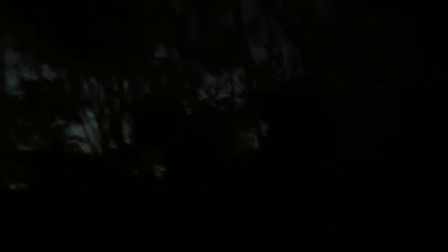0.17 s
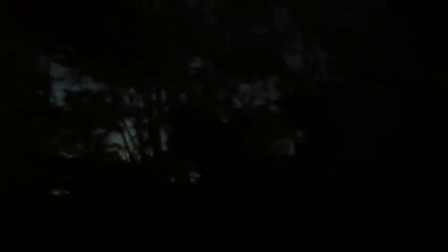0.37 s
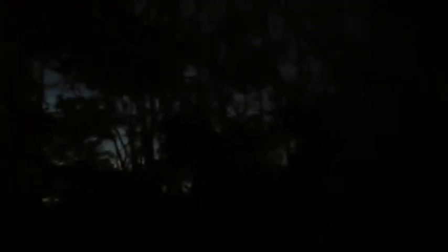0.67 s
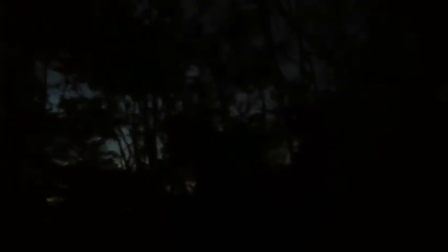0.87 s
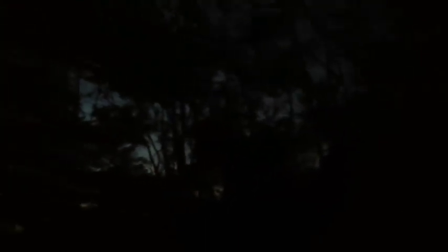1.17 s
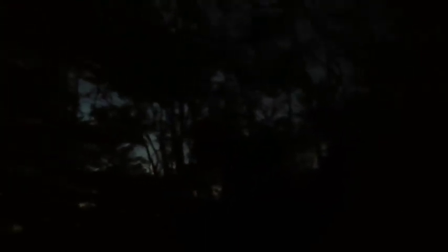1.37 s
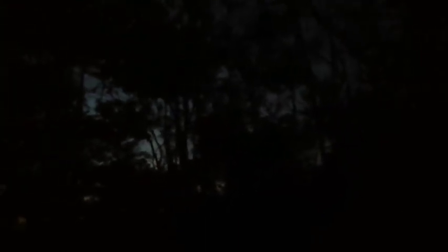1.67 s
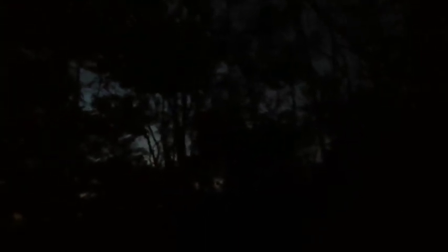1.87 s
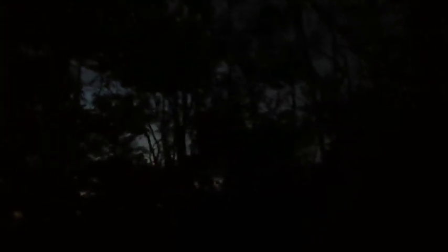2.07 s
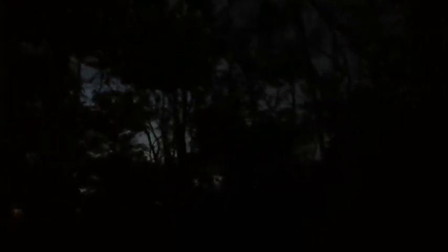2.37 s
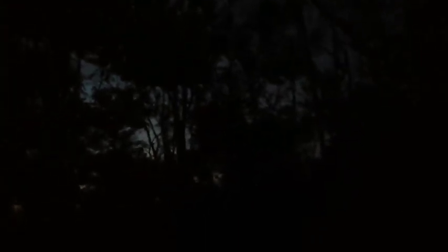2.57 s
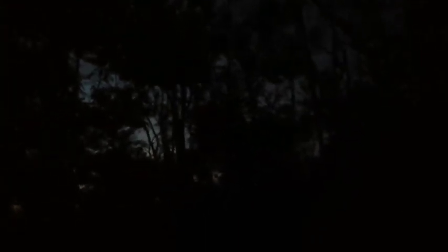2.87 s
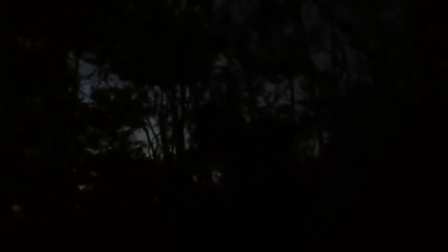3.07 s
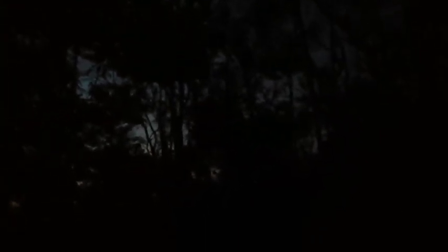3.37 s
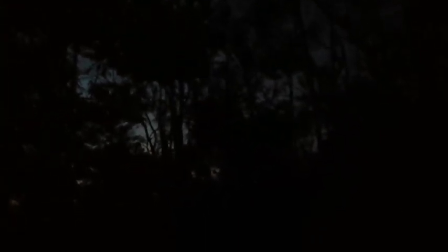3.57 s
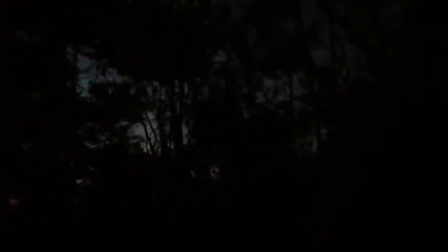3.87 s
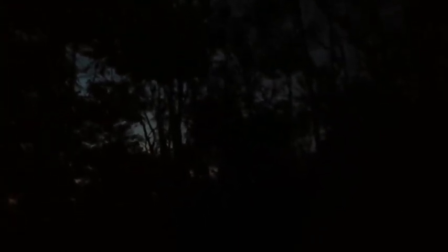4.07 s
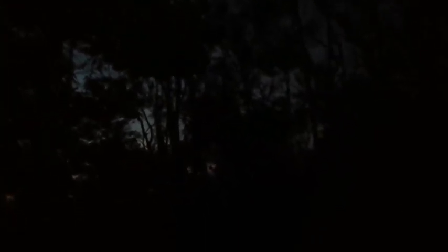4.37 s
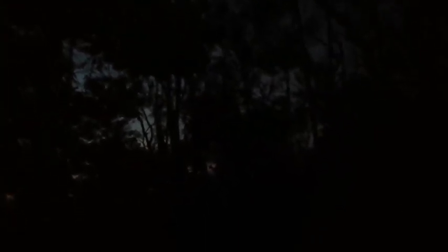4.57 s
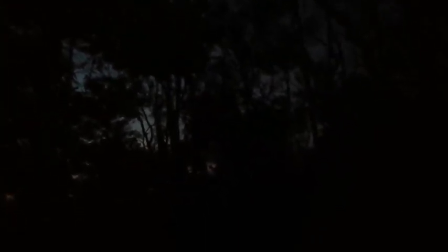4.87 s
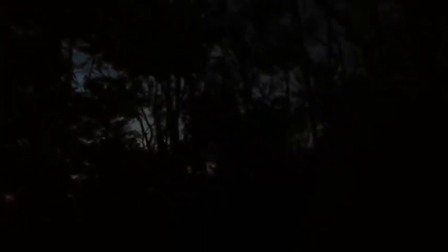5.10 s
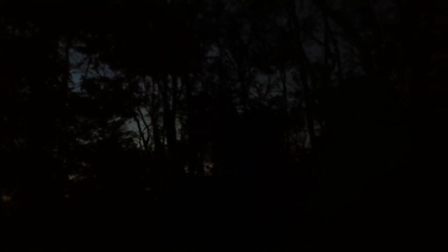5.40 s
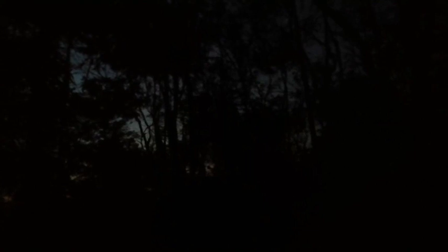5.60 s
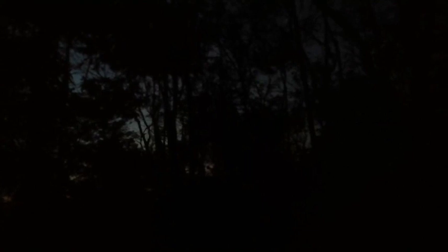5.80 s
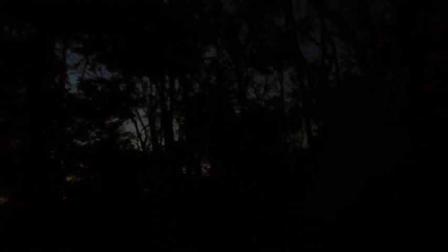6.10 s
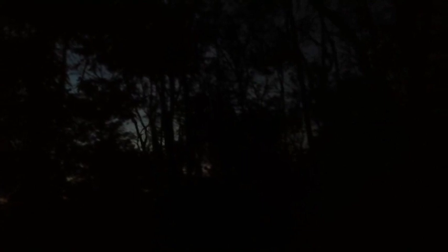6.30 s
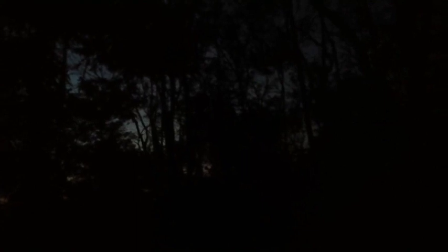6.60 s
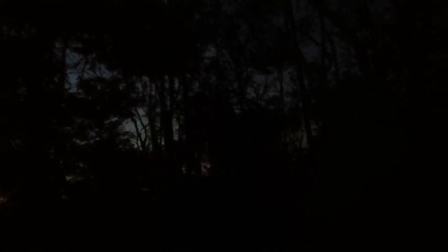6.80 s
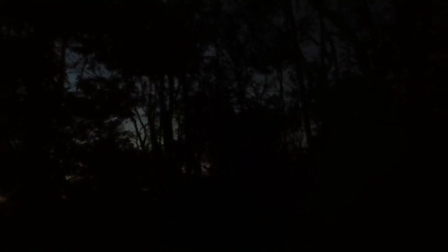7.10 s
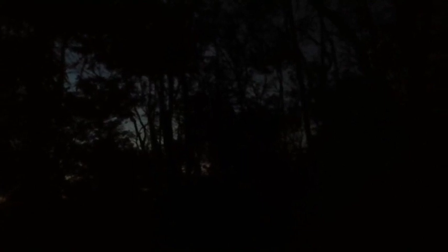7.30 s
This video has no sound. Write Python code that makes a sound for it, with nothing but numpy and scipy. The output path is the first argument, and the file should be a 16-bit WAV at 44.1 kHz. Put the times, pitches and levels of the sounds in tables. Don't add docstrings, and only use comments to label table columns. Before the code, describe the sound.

Steady shrill insect trilling in nighttime woods, five quick katydid chirps at first, then dull handling bumps and a few dry twig ticks.

```python
import sys
import numpy as np
from scipy import signal
from scipy.fft import rfft, irfft
from scipy.io import wavfile
from scipy.ndimage import uniform_filter1d

SR = 44100
rng = np.random.default_rng(int(sys.argv[2]) if len(sys.argv) > 2 else 0)


def makeup_ratio(level_db):
    decades = np.asarray(level_db, float) / 20
    return 10 ** decades


def wrap_up_sound(samples):
    columns = np.atleast_2d(samples).T
    tamed = np.clip(columns, -1, 1)
    steps = np.round(tamed * 32767).astype(np.int16)
    wavfile.write(sys.argv[1], SR, steps)


N = 328545


def evened(x):
    return x / np.sqrt(np.mean(x ** 2) + 1e-20)


def curve(rows, column, at):
    rows = np.array(rows, float)
    return np.interp(at, rows[:, 0], rows[:, column])


def read(points, hz):
    f, value = np.transpose(points)
    return np.interp(np.log(hz + 1), np.log(f + 1), value, -90, -90)


def add(mix, s, sound):
    start = round(s * SR)
    part = mix[:, max(start, 0):][:, :sound.shape[1] + min(start, 0)]
    part += sound[:, max(-start, 0):][:, :part.shape[1]]


def layer(rows, source):
    out = np.zeros((2, N))
    for s, *settings in rows:
        add(out, s, source(*settings))
    return out


def drift(hz):
    t = np.arange(0, N + 256, 256) / SR
    f = np.geomspace(hz / 20, hz, num=16)[:, None]
    waves = np.sin(2 * np.pi * (f * t + rng.random((16, 1)))) / np.sqrt(f)
    return np.interp(np.arange(N) / SR, t, evened(waves.sum(0)))


def loop(cycle, turns):
    place = turns % 1 * len(cycle)
    at = place.astype(int)
    return cycle[at] + np.diff(cycle, append=cycle[0])[at] * (place - at)


def band(x, lo_hz, hi_hz):
    return signal.sosfilt(signal.butter(2, [lo_hz, hi_hz], "band", fs=SR, output="sos"), x)


def swells(rows):
    t = np.arange(N) / SR
    return sum(makeup_ratio(db) * np.exp(np.minimum((t - s) / rise, (s - t) / fade)) for s, db, rise, fade in rows)


def pan(pan_db):
    return np.array([[pan_db / 2], [-pan_db / 2]])


def soft_tone(db, length_s, hz, pan_db):
    t = np.arange(round(length_s * SR)) / SR
    waver = 0.0097 * evened(uniform_filter1d(rng.standard_normal(len(t)), 300))
    turns = np.cumsum(hz * (1 + waver)) / SR
    return makeup_ratio(db + 6 + pan(pan_db)) * np.sin(2 * np.pi * turns) * np.hanning(len(t))


def singer(song, tones, effort_db):
    leaves, wobble, scatter, fuzz = .35, .001, .08, 0.39
    t = np.arange(N) / SR
    turns = np.cumsum(curve(song, 1, t)) / SR + wobble * drift(9)
    effort_t = np.linspace(song[0][0], song[-1][0], num=5)
    level = uniform_filter1d(makeup_ratio(np.interp(t, effort_t, effort_db, -60, -60)), 6000)
    multiple, *sides = np.transpose(tones)
    sweep = multiple ** 2 / 70 + rng.random() * multiple
    out = np.zeros((2, N))
    for side, side_db in enumerate(sides):
        detour = .6 * (rng.random() - .5) + .03 * rng.standard_normal() * (multiple - 95)
        path = side * detour
        uneven = fuzz * evened(uniform_filter1d(rng.standard_normal(N), 500))
        shapes = ((1, scatter), (leaves * drift(2.48), 1), (uneven, 3 * scatter))
        for weight, spread in shapes:
            lines = np.zeros(4097, complex)
            phase = sweep + path + spread * rng.standard_normal(len(multiple))
            lines[multiple.astype(int)] = makeup_ratio(side_db) * np.exp(-2j * np.pi * phase)
            out[side] += weight * loop(irfft(lines) * 4096 * np.sqrt(2), turns)
    return out * level


def near_singers():
    # t/s, cycle rate/Hz
    steady = [(0, 58.7), (1.57, 58.71), (4.71, 58.77), (7.45, 58.72)]
    rising = [(0, 60.05), (3.14, 60.14), (3.6, 60.26), (4.71, 60.27), (7.45, 60.49)]
    gliding = [(2.9, 57.26), (4.14, 54.67), (4.6, 54.23), (5.4, 54.04), (6, 54.04), (7.45, 54.2)]
    sinking = [(3.5, 58.05), (4.29, 57.85), (4.69, 57.52), (5.87, 57.2), (6.66, 57.26), (7.45, 57.21)]
    brief = [(1.8, 57.88), (3.2, 57.87)]
    wavering = [(.3, 57.03), (1.13, 57.02), (1.55, 57.23), (1.97, 57.27), (2.7, 56.97), (4.05, 56.92),
                (5.3, 56.94)]
    late = [(5, 56.52), (5.82, 56.48), (6.63, 56.56), (7.45, 56.53)]
    # multiple of the cycle rate, left level/dB, right level/dB
    steady_tones = [(78, -57, -55), (79, -52, -54), (85, -51, -49), (90, -52, -50), (91, -46, -44),
                    (92, -39, -46), (93, -45, -46), (94, -51, -51), (104, -50, -59), (116, -55, -57),
                    (117, -54, -54), (118, -53, -57), (127, -47, -64), (128, -55, -62), (129, -48, -57),
                    (130, -49, -61), (131, -47, -64), (137, -46, -72), (139, -47, -62), (145, -50, -73),
                    (150, -48, -68)]
    rising_tones = [(83, -47, -48), (84, -49, -53), (85, -57, -58), (86, -57, -60), (91, -60, -50),
                    (92, -62, -56), (93, -54, -54), (94, -42, -47), (95, -43, -44), (96, -45, -47),
                    (97, -51, -60), (104, -63, -58), (106, -53, -57), (107, -59, -56), (108, -59, -56),
                    (120, -54, -65), (124, -53, -70), (126, -52, -62), (128, -59, -68), (129, -52, -69),
                    (146, -57, -68), (147, -57, -65), (153, -53, -65)]
    gliding_tones = [(95, -49, -53), (96, -43, -50), (97, -49, -53), (100, -46, -54), (105, -45, -49),
                     (106, -48, -54), (107, -54, -51), (108, -43, -46), (109, -43, -44), (110, -50, -52),
                     (114, -53, -52), (119, -55, -58), (120, -51, -56), (126, -50, -59), (132, -48, -64),
                     (138, -43, -59), (149, -41, -58), (150, -42, -56), (151, -46, -66), (160, -46, -62),
                     (161, -49, -65), (163, -46, -64)]
    sinking_tones = [(99, -45, -48), (100, -51, -51), (102, -47, -47), (103, -44, -50), (120, -52, -59),
                     (125, -49, -70), (130, -38, -57), (131, -38, -54), (133, -48, -65), (135, -48, -63),
                     (141, -48, -51), (142, -49, -68), (144, -46, -61), (145, -38, -62), (146, -49, -63),
                     (150, -48, -60), (151, -49, -62), (152, -47, -63), (154, -47, -63), (155, -49, -59)]
    brief_tones = [(100, -58, -52), (119, -57, -61), (120, -65, -56), (121, -49, -62), (123, -54, -59),
                   (130, -45, -59), (131, -44, -59), (132, -51, -64), (133, -50, -65), (134, -55, -62),
                   (138, -49, -64), (139, -56, -64), (140, -46, -60), (141, -41, -55), (143, -50, -62),
                   (149, -49, -70), (152, -56, -63), (154, -53, -67), (156, -53, -66), (162, -52, -68)]
    wavering_tones = [(80, -58, -58), (89, -50, -61), (91, -50, -56), (95, -45, -58), (96, -47, -48),
                      (97, -49, -51), (98, -52, -55), (99, -46, -54), (102, -58, -53), (103, -53, -51),
                      (104, -52, -57), (105, -51, -63), (114, -53, -61), (125, -56, -56), (126, -53, -62),
                      (127, -48, -54), (133, -50, -66), (134, -54, -70), (138, -49, -62), (139, -49, -62),
                      (140, -49, -65)]
    late_tones = [(77, -64, -58), (79, -52, -56), (81, -66, -55), (109, -58, -56), (126, -62, -57),
                  (127, -48, -60), (128, -47, -52), (132, -43, -61), (134, -52, -61), (135, -50, -61),
                  (138, -50, -72), (150, -52, -70), (152, -42, -57), (153, -43, -61), (154, -47, -60),
                  (155, -58, -65), (156, -42, -62), (157, -46, -57), (158, -53, -60), (159, -54, -55)]
    efforts = [
        (-2, 0, 0.5, -4, 1),
        (5, 2.5, 2.5, 3.5, 0.5),
        (-4, -1, 2.5, 4, -1),
        (-14, -19, -23, -17, -21),
        (-8, 1, 3, 3, 3),
        (2, 0, -5, 0.5, 3),
        (-15, -6, -1, -1, -13),
    ]
    songs = (steady, rising, gliding, sinking, brief, wavering, late)
    combs = (steady_tones, rising_tones, gliding_tones, sinking_tones, brief_tones, wavering_tones, late_tones)
    return sum(singer(song, comb, effort_db) for song, comb, effort_db in zip(songs, combs, efforts))


def rasp(db, length_s):
    # f/Hz, width/Hz, level/dB
    wing = [
        (14650, 460, 0),
        (13950, 600, -6),
        (15000, 400, -8),
        (13200, 1100, -11),
    ]
    scrape_db, scrape_s = -11, 0.015
    t = np.arange(round(length_s * SR)) / SR
    strikes = rng.random(len(t)) < 900 / SR
    teeth = rng.standard_normal((2, len(t))) * (1 + strikes * 3)
    rung = 0
    for wing_hz, width_hz, wing_db in wing:
        hz = wing_hz * rng.uniform(1.0, 1.012) - 900 * np.exp(-t / 0.0082) - 3000 * t
        turn = np.exp(2j * np.pi * np.cumsum(hz) / SR)
        r = np.exp(-np.pi * width_hz / SR)
        mode = (turn * signal.lfilter([1], [1, -2 * r, r * r], teeth / turn)).real
        rung = rung + makeup_ratio(wing_db + rng.uniform(-2.7, 2.5)) * evened(mode)
    drag = np.exp(2j * np.pi * np.cumsum(11100 + 40000 * t) / SR)
    scrape = evened((drag * signal.lfilter([1], [1, -1.8, .81], teeth / drag)).real)
    scrape = scrape * t / scrape_s * np.exp(1 - t / scrape_s)
    u = t / length_s / 0.18
    stroke = 1.4 * (u * np.exp(1 - u)) ** 1.9
    stutter = makeup_ratio(2.2 * evened(uniform_filter1d(rng.standard_normal(len(t)), 130)))
    return makeup_ratio([[db], [db - 17]]) * stutter * (evened(rung) * stroke + makeup_ratio(scrape_db) * scrape)


def chirp(db):
    full, weak = rasp(db, 0.14), rasp(db - 3.5, 0.067)
    out = np.pad(full, ((0, 0), (round(0.034 * SR), 0)))
    add(out, 0, weak)
    return out


def katydid():
    # t/s, level/dB
    strokes = [
        (-.03, -27),
        (0.202, -27.5),
        (.408, -23.5),
        (.638, -26.5),
        (.862, -26.5),
    ]
    return layer([(s - 0.034, db) for s, db in strokes], chirp)


def bump(db, swing_s, fade_s, sign):
    slowing = 1.95
    t = np.arange(6000) / SR
    swings = np.log(1 + t / swing_s * (slowing - 1)) / np.log(slowing)
    flex = sign * np.sin(np.pi * swings) * np.exp(-t / fade_s) * (1 - np.exp(-3 * t / swing_s))
    muffle = signal.butter(6, 1900, fs=SR, output="sos")
    return makeup_ratio([[db - 40], [db]]) * signal.sosfilt(muffle, band(flex, 10, 3500))


def hand_bumps():
    # t/s, level/dB, first swing/s, fade/s, sign and strength
    knocks = [(.471, -24, .008, 0.016, 1), (.5018, -11.5, .003, 0.0043, 1),
              (.5045, -14, 0.005, 0.004, -0.91), (.556, -20, .012, 0.025, -0.44),
              (1.018, -19, 0.0083, .01, -1), (1.0301, -2, 0.00054, 0.001, -1.74),
              (1.0304, 2.5, 0.001, 0.0027, -0.88), (1.034, -4.5, .0055, 0.0035, -0.94),
              (1.0154, -14, .0006, .001, -1), (1.053, -25, 0.011, .03, -0.89), (1.079, -24, 0.012, .03, -1),
              (1.1355, -15, 0.0028, .003, 0.94), (1.1412, -22, 0.0018, .003, -0.84),
              (1.1575, -23, 0.0023, .003, -1), (1.1615, -24, 0.0013, 0.0024, -0.85),
              (1.1685, -18, 0.0018, 0.0023, 1), (1.177, -21, 0.0023, .004, -0.71),
              (1.183, -19, 0.0023, 0.0065, -0.69), (1.193, -24, 0.0063, .01, -0.69),
              (1.207, -21, 0.0052, .008, -0.91), (1.1343, -13, 0.00095, 0.0066, -0.64),
              (1.1535, -10.5, .0038, .006, 1), (1.1664, -10.5, 0.0022, 0.0042, -1)]
    return layer(knocks, bump)


def hand_rumble():
    # t/s, level/dB, rise/s, fade/s
    shifts = [
        (0.52, -48, 0.069, 0.14),
        (0.745, -49, .04, 0.18),
        (1.4, -51, 0.018, 0.031),
        (1.06, -40, 0.022, 0.031),
        (0.072, -52.5, .1, 0.28),
    ]
    rumble = makeup_ratio(7.5) * swells(shifts) * evened(band(rng.standard_normal(N), 15, 137))
    return np.array([np.zeros(N), rumble])


def strap():
    # t/s, level/dB, rise/s, fade/s
    groans = [
        (.35, -52, 0.41, 0.2),
        (.75, -45.5, 0.1, 0.14),
    ]
    # t/s, level/dB, f/Hz, left minus right/dB
    slips = [
        (.39, -53, 406, -1),
        (.43, -45, 326, 1),
        (.775, -48, 378, -2),
        (.81, -51, 324, -4),
        (.88, -52, 340, -6),
        (.92, -51, 300, 4),
    ]
    rub = swells(groans) * evened(band(rng.standard_normal((2, N)), 270, 380))
    return rub + layer(slips, lambda db, hz, pan_db: soft_tone(db, 0.042, hz, pan_db))


def twig_tick(db, hz, pan_db):
    t60_s = 0.012
    t = np.arange(2000) / SR
    modes = np.sin(2 * np.pi * hz * t) + 0.23 * np.sin(2 * np.pi * 1.22 * hz * t)
    tone = modes * (1 - np.exp(-t / 0.0007))
    return makeup_ratio(db + 8.5 - 60 * t / t60_s + pan(pan_db)) * tone


def twigs():
    # t/s, level/dB, f/Hz, left minus right/dB
    ticks = [
        (1.0138, -44, 740, -38),
        (1.8687, -36, 1590, -18),
        (2.1665, -33, 1400, -9),
        (2.5506, -40, 990, -2.0),
    ]
    return layer(ticks, twig_tick)


def frog():
    # t/s, level/dB
    pips = [(0, -54), (.045, -59), (1.43, -58), (1.47, -62), (1.54, -62), (1.69, -64), (2.925, -61),
            (2.972, -59), (3, -60), (3.017, -57), (4.495, -65), (4.54, -69), (4.57, -57), (6.048, -61),
            (6.118, -54), (6.15, -66)]
    return layer(pips, lambda db: soft_tone(db, 0.071, 1572, 5))


def drips():
    # t/s, level/dB, f/Hz, left minus right/dB
    drops = [(.26, -59, 1460, 10), (.315, -55, 1380, 8), (.5, -65, 1290, 6), (.54, -58, 1113, 6),
             (1.875, -56, 1410, -6), (6.0, -57, 786, 0), (6.1, -57, 780, 0), (6.485, -54, 920, -1),
             (6.502, -55, 1050, 3), (6.52, -54, 943, 0), (6.537, -53.5, 1210, 0), (6.55, -56, 764, 0),
             (6.55, -59, 1800, 0), (6.568, -56, 1285, 0), (6.59, -57, 790, 1), (6.675, -53, 930, 1)]
    return layer(drops, lambda db, hz, pan_db: soft_tone(db, 0.039, hz, pan_db))


def leaves_brushed():
    # t/s, level/dB, rise/s, fade/s
    brushes = [
        (.33, -58.5, 0.98, 0.67),
        (1.85, -58, 0.16, 0.13),
        (6.56, -55.5, 0.086, 0.083),
    ]
    return makeup_ratio(9.5) * swells(brushes) * evened(band(rng.standard_normal((2, N)), 435, 1370))


def crowd():
    # t/s, level/dB
    swell = [(0, -2.5), (1.5, -0.5), (3, -0.2), (4.3, 1.5), (5.6, 1.1), (7.45, 1.4)]
    # f/Hz, level/dB per Hz
    low_song = [(1650, -63), (2800, -28.5), (3000, -24.5), (3220, -23.5), (3650, -18), (3960, -22),
                (4310, -12.5), (4600, -10), (4770, -16.5), (4880, -4.5), (5420, -8), (5560, -12),
                (5720, -2.5), (5890, -3.5), (6090, -6), (6350, -11), (6680, -15), (6950, -8), (8970, -23.5),
                (15200, -120)]
    high_song = [(3820, -33), (6500, -37), (6830, -12), (7350, -3), (8370, -0.5), (9950, -10.5),
                 (10500, -14.5), (14000, -64), (22000, -120)]
    fizz = [(9000, -22), (10400, -6), (11250, -3.5), (11800, -.5), (13100, 0), (14050, -3), (14650, -1),
            (15100, -2), (15300, -8), (15850, -10)]
    # level/dB, share of the swell
    parts = [
        (-34, 0.32),
        (-33, 0.88),
        (-42, 1.15),
    ]
    loose, wander, throb, smooth_hz = .4, .0008, .3, 10200
    ribs_db, patchy_db = 4.0, 1.2
    drive = np.zeros((2, N))
    burst = evened(np.exp(throb * np.cos(2 * np.pi * np.arange(4096) / 4096)))
    overtone = np.arange(2049)
    for rate in rng.uniform(55.5, 61.5, 8):
        turns = np.cumsum(rate * (1 + wander * drift(1.5))) / SR + rng.random()
        favour_db = ribs_db * rng.standard_normal(2049) * np.where(overtone * rate < smooth_hz, 1, .5)
        ribs = makeup_ratio(favour_db) * (overtone < 300)
        for side in range(2):
            shape = irfft(rfft(rng.standard_normal(4096) * burst) * ribs)
            fresh = loop(burst, turns) * rng.standard_normal(N)
            drive[side] += np.sqrt(1 - loose) * loop(evened(shape), turns) + np.sqrt(loose) * fresh
    hz, t, z = signal.stft(drive, SR, nperseg=1024)
    z /= uniform_filter1d(np.sqrt((abs(z) ** 2).mean(2)), 30)[..., None]
    patches = uniform_filter1d(rng.standard_normal(z.shape), 5, 1)
    patches = evened(uniform_filter1d(patches, 40, 2))
    patches *= np.where(hz < smooth_hz, 1, .55)[:, None]
    power = 0
    for (db, share), spectrum in zip(parts, (low_song, high_song, fizz)):
        shape = makeup_ratio(read(spectrum, hz)) ** 2
        level = makeup_ratio(db + share * curve(swell, 1, t))
        power = power + np.outer(shape / shape.sum(), level ** 2)
    return ports(z * np.sqrt(power) * makeup_ratio(patchy_db * patches), hz)


def hiss():
    # f/Hz, level/dB per Hz
    noise_floor = [(12, -30), (20, 0), (22, -2), (49, 3.5), (90, -1.5), (225, -5), (771, -10.5),
                   (1130, -12), (1550, -15), (1690, -15), (3200, -16.5), (4160, -36), (7040, -120)]
    hz, t, z = signal.stft(rng.standard_normal((2, N)), SR, nperseg=1024)
    shape = makeup_ratio(read(noise_floor, hz))
    z = z / np.sqrt((abs(z) ** 2).mean()) * (shape / np.linalg.norm(shape))[:, None]
    return makeup_ratio(-47.5) * ports(z, hz)


def ports(z, hz):
    # f/Hz, left minus right/dB
    mismatch = [(60, -4), (99, -2.5), (160, -2.5), (270, -3.5), (450, -2.5), (740, -3.5), (1220, -2.5),
                (2010, -2.5), (3330, -1), (5500, 5), (6300, -0.5), (7500, 16.5), (8300, 13.5), (9200, 12.5),
                (10500, 15), (15000, 18)]
    lean_hz, lean_db = np.transpose(mismatch)
    lean = makeup_ratio(np.interp(np.log(hz + 1), np.log(lean_hz), lean_db))
    sides = 2 * np.array([lean, np.ones_like(lean)]) / np.sqrt(1 + lean ** 2)
    return signal.istft(z * sides[..., None] * np.sqrt(.75), nperseg=1024)[1][:, :N]


def scene():
    insects = near_singers() + katydid() + crowd()
    handling = hand_bumps() + hand_rumble() + strap()
    woods = twigs() + frog() + drips() + leaves_brushed()
    return insects + handling + woods + hiss()


def top_cut(x):
    return signal.sosfilt(signal.butter(12, 15860, fs=SR, output="sos"), x)


def record(dry):
    treble_cut = signal.firwin(1023, 15130, window=("kaiser", 9), fs=SR)
    dull = signal.oaconvolve(dry[1], treble_cut, "same")
    mix = np.array([dry[0], dull]) - makeup_ratio([[-52.4], [-50.5]])
    return top_cut(mix)


dry = scene()
out = record(dry)
wrap_up_sound(out)
```